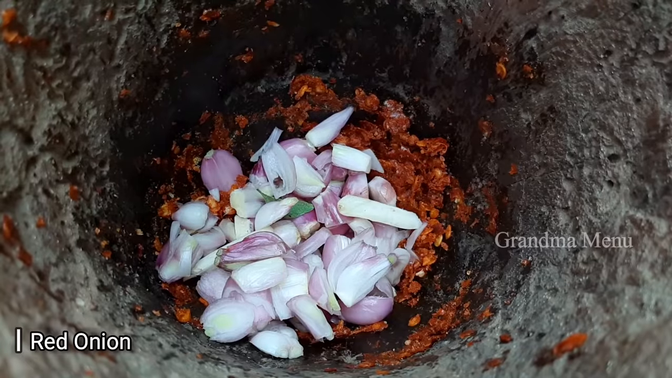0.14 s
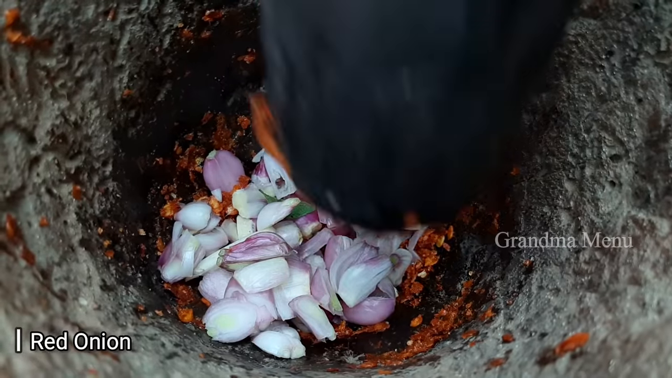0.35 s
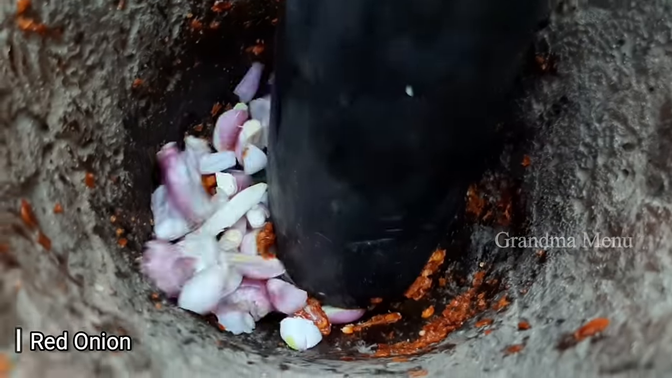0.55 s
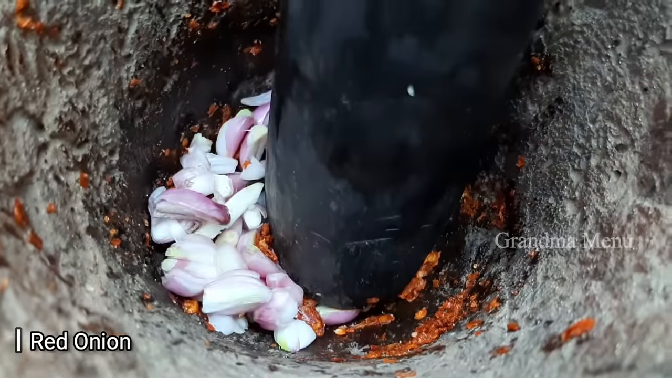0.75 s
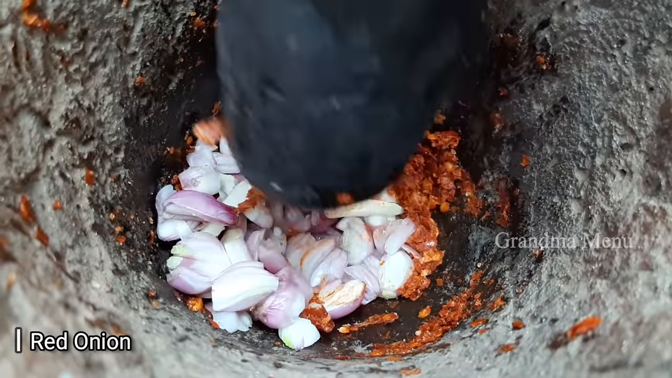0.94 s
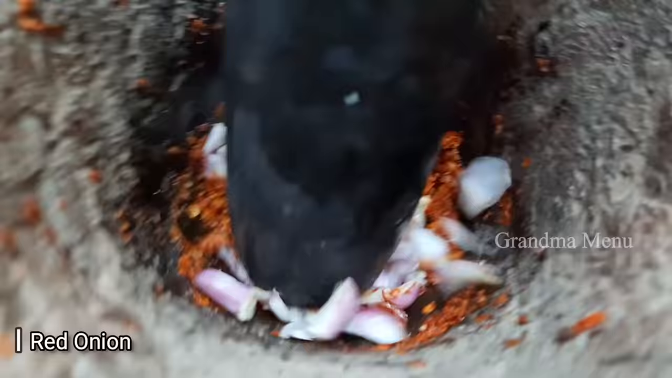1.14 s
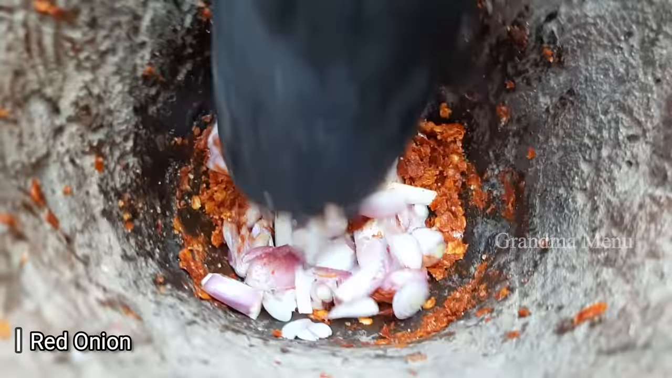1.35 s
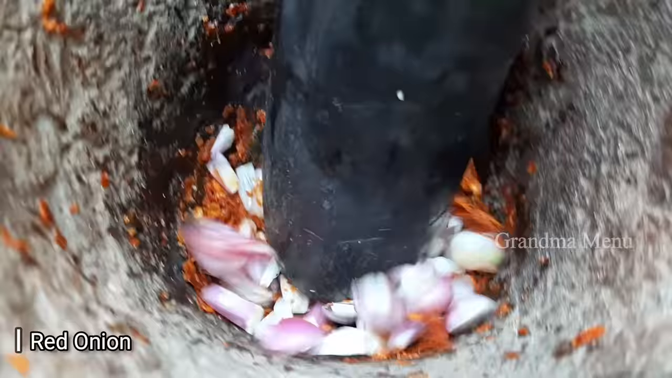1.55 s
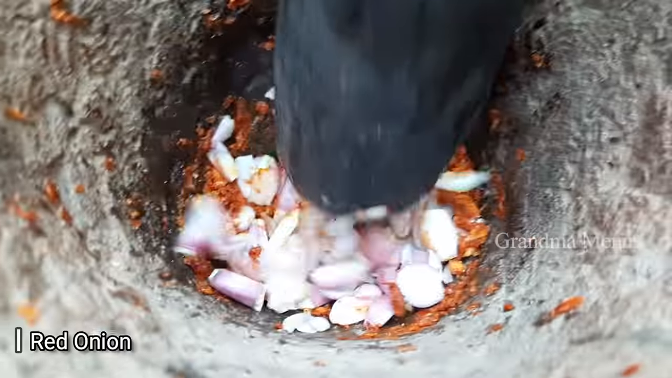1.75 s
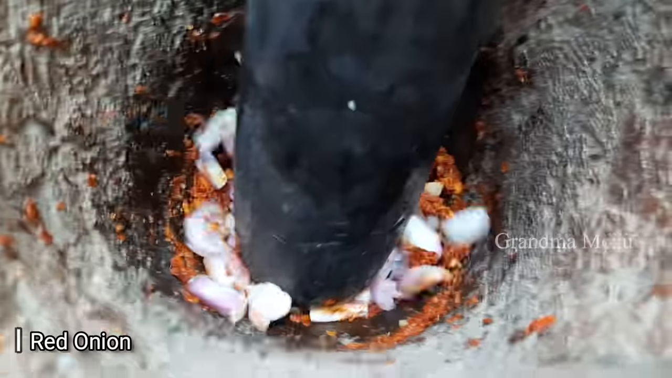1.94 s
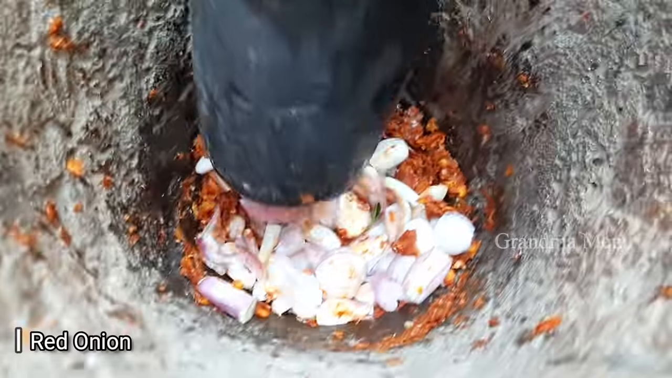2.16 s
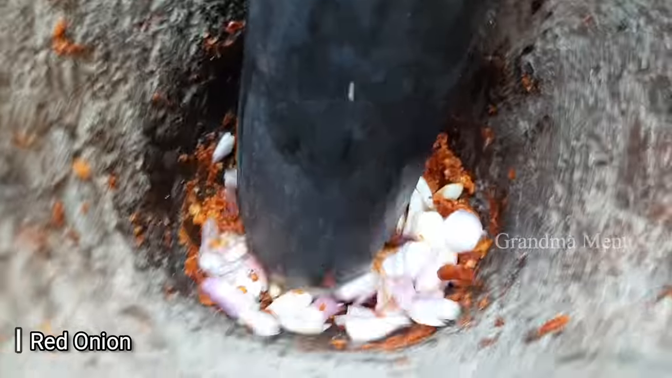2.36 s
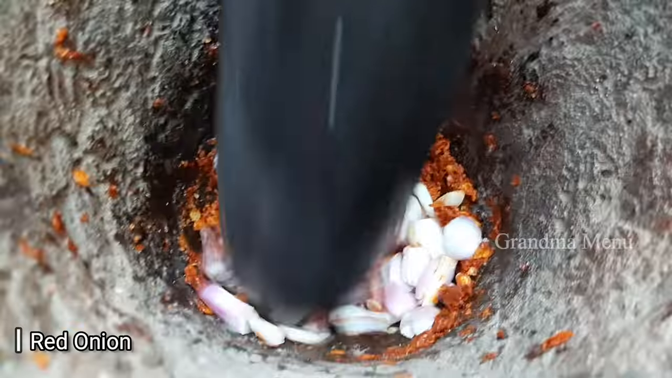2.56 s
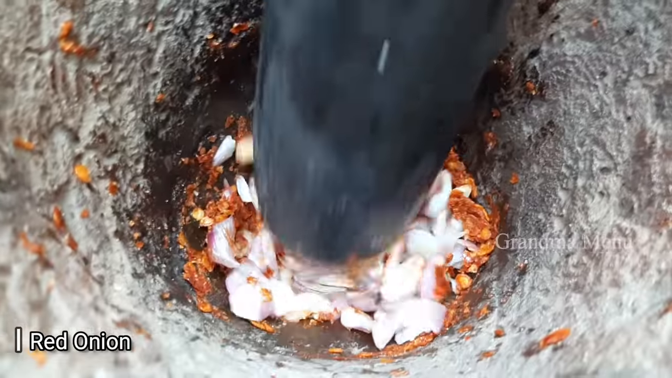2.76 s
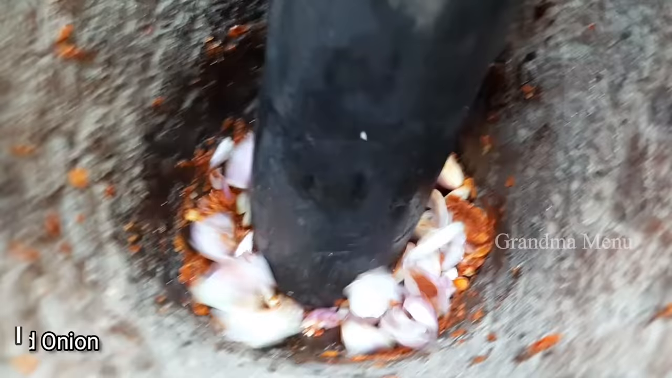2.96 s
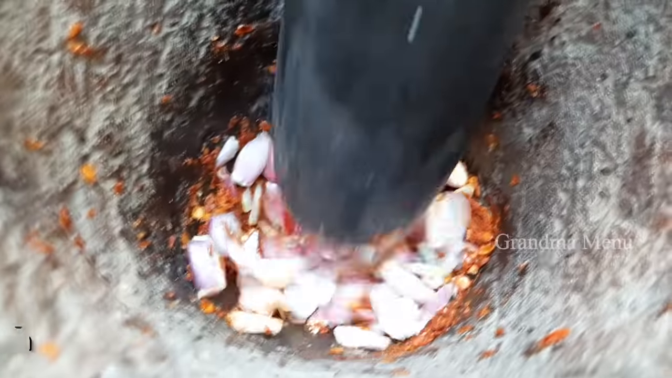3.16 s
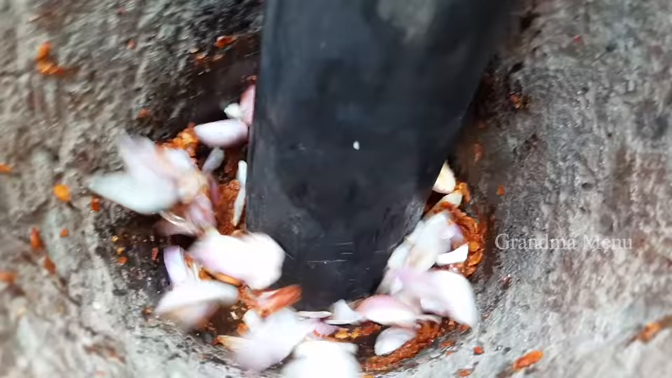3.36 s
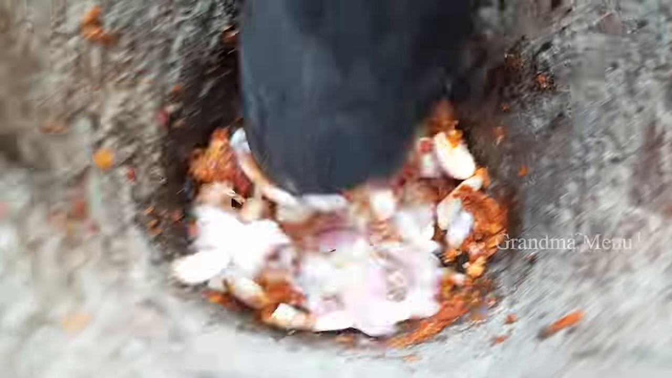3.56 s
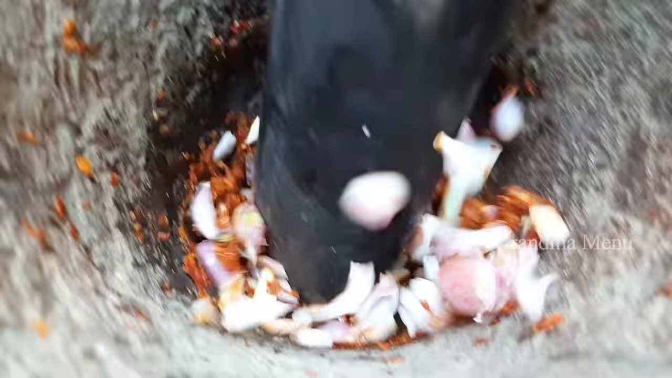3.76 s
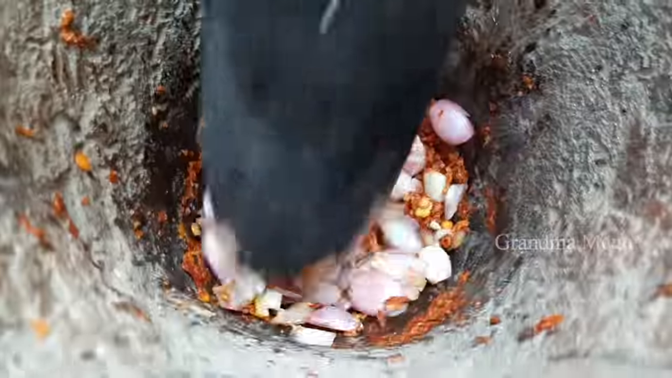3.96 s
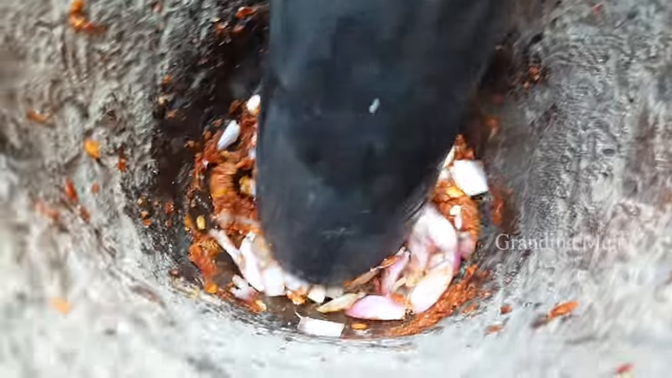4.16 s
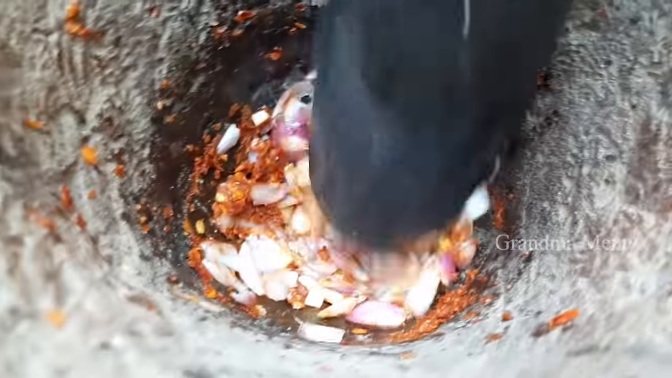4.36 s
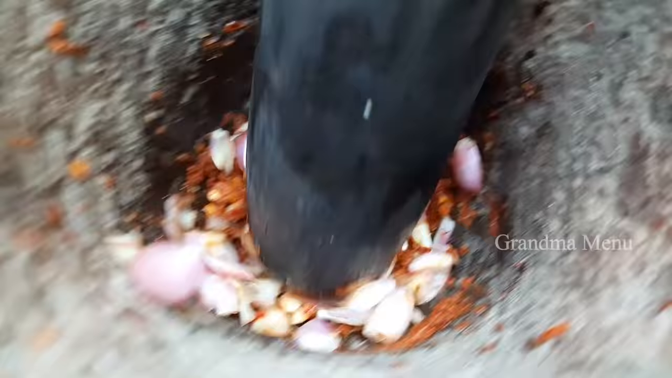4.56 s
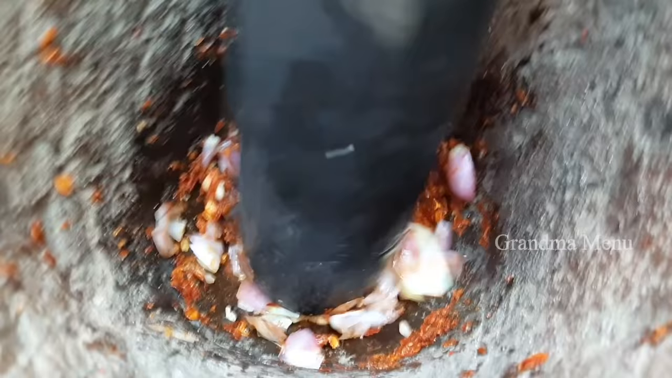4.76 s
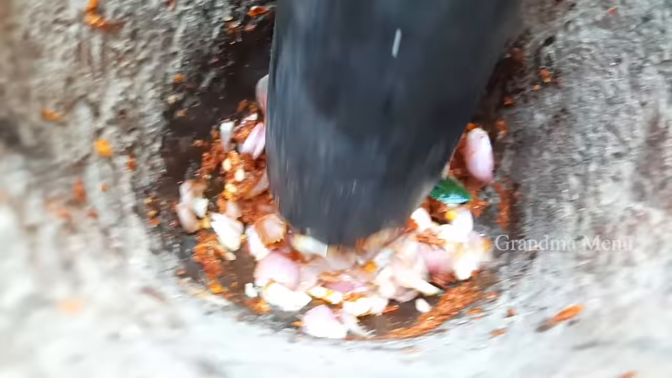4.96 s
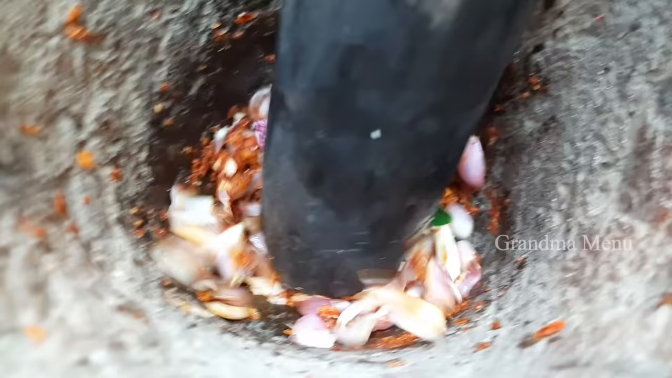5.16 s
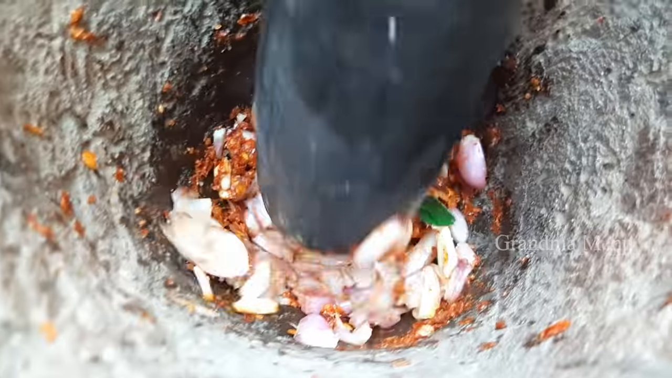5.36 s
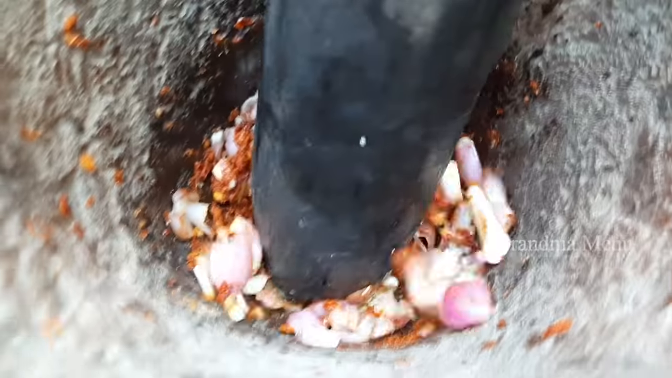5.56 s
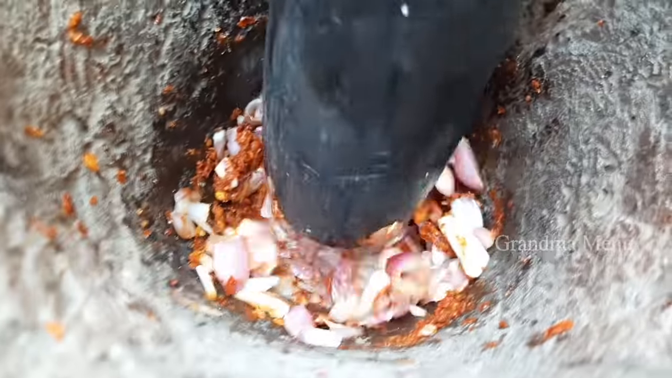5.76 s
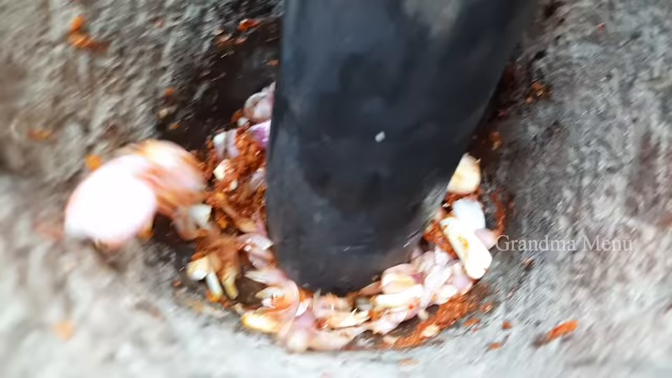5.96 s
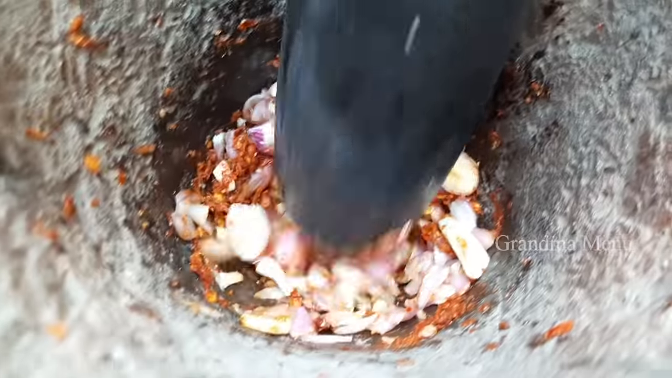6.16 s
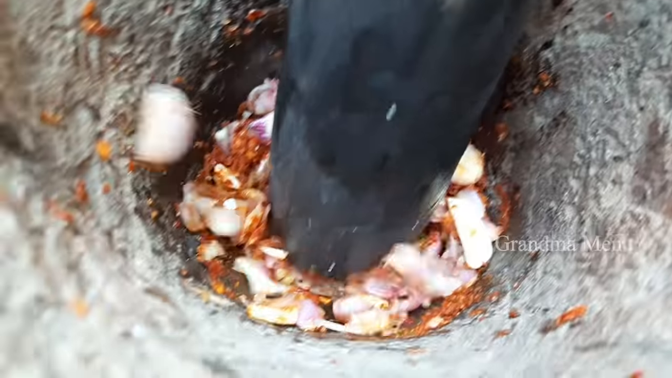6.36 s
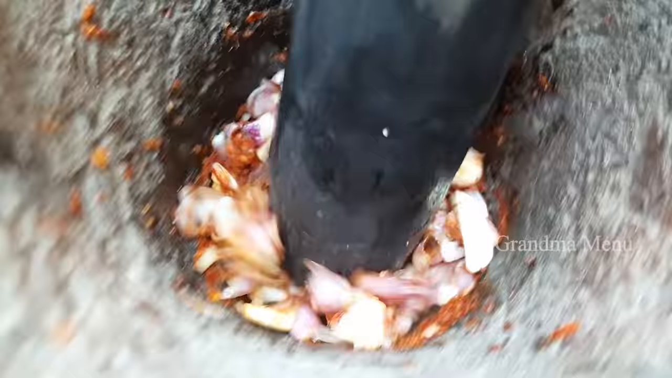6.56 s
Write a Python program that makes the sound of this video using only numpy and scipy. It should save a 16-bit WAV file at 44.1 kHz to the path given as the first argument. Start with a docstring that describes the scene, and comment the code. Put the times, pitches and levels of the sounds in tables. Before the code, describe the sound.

A wooden pestle pounds sliced shallots and chilli paste in a deep mortar, close to the microphone and slightly left. The first stroke lands at about 0.5 seconds as a quick cluster of hollow knocks with a crunch. After a short pause, pounding resumes at 1.2 seconds and continues evenly, nearly three strokes a second. Each stroke mixes a wet crunch with a low thump. Those near 1.9, 2.7 and 4.8 seconds strike the bowl harder and ring briefly. From 3 to 3.8 seconds the strokes are crisp and juicy, and the loudest crunches come from 5.5 seconds to the last at 6.3. Flung wet bits land with small slaps around 1.5, 3.1, 4.3 and 5.6 seconds. Behind it all are a faint low rumble, soft hiss with occasional thin high swells, and a distant insect buzzing, clearest around one second.

```python
"""Pounding shallots in a mortar

Close to the microphone, a long wooden pestle pounds sliced shallots and chilli paste in a deep mortar.
Each stroke crushes crisp flesh and thumps the mortar on its support; some reach the bottom and make
it ring. Wet bits fly and land. Behind are a low rumble, soft hisses and the buzz of a far insect."""
import sys
import numpy as np
from scipy import signal
from scipy.fft import rfft, irfft, next_fast_len
from scipy.io import wavfile

SR = 44100
rng = np.random.default_rng(int(sys.argv[2]) if len(sys.argv) > 2 else 0)


def wav_record(signal):
    """Record a signal, one row per channel, as 16-bit PCM in the file named by sys.argv[1]."""
    frames = np.transpose(np.atleast_2d(signal))
    bounded = np.clip(frames, -1, 1)
    # unit amplitude maps onto the largest positive 16-bit level
    quanta = np.round(bounded * 32767).astype(np.int16)
    wavfile.write(sys.argv[1], SR, quanta)


N = 291501
T = np.arange(N) / SR

# Table levels are relative: each source adds its own gain.
# spectrum of the background rumble: f/Hz, level/dB
RUMBLE_SPECTRUM = [(20, -38), (32, -20), (48, 1), (75, 0), (120, -8), (170, -15), (240, -15), (400, -24),
                   (550, -21), (900, -32), (2000, -48), (8000, -80)]
# slow rise and fall of the rumble: t/s, level/dB
RUMBLE_LEVELS = [(0.0, -57), (1.91, -55), (2.8, -61), (5.96, -57), (6.61, -53)]
# spectrum of the background hiss: f/Hz, level/dB
HISS_SPECTRUM = [(100, -35), (900, -11), (1500, 1), (2300, 3), (3200, -1), (4200, -4), (5400, -3.5),
                 (7500, -8), (9500, -12.5), (12000, -9), (16000, -8)]
# rise and fall of the hiss: t/s, middle/dB, treble/dB
HISS_LEVELS = [(0.0, -62, -62), (0.53, -61, -62), (0.81, -65, -68), (1.29, -63, -62), (1.54, -65, -64),
               (1.69, -70, -76), (2.08, -73, -81), (3.09, -72, -80), (3.2, -69, -78), (3.74, -68, -78),
               (3.88, -65, -73), (5.21, -64, -71), (5.69, -66, -69), (6.61, -64, -69)]
# likeness of the background at left and right: f/Hz, correlation
COHERENCE = [(60, .96), (290, .85), (640, .55), (1400, 0), (16000, 0)]
# high hisses: t/s, length/s, f/Hz, width/Hz, level/dB
HIGH_HISSES = [(.41, .22, 13000, 6000, -52), (.71, .14, 5400, 250, -59), (1.28, .45, 12350, 160, -61),
               (1.2, .6, 15200, 400, -63), (1.55, .3, 5300, 200, -63), (5.72, .8, 5350, 300, -58)]
# swells of the far insect: t/s, level/dB
INSECT_LEVELS = [(0, -61), (.65, -62), (1.0, -50), (1.15, -57), (1.38, -54), (1.9, -78), (3.4, -76),
                 (3.95, -63), (6.6, -65)]
# resonances of its body: f/Hz, width/Hz, level/dB
INSECT_BODY = [(2270, 200, 0), (5300, 300, -15)]
# resonances of the bowl's hollow: f/Hz, width/Hz, level against the direct sound/dB
BOWL_RESONANCES = [(570, 70, 8), (1160, 90, -3), (1520, 70, 5.5), (2030, 70, 0), (3180, 160, -2),
                   (3600, 90, -2), (4800, 100, 4), (5500, 100, -3), (6650, 250, -3), (8900, 90, 0),
                   (11400, 120, 4), (14200, 110, 2), (15080, 90, 3)]
# wet bits landing: t/s, level/dB, low edge/Hz
LANDINGS = [(1.503, -30, 600), (2.728, -40, 3500), (3.1405, -23, 2800), (3.688, -31, 2800),
            (4.160, -37, 2800), (4.299, -24, 2800), (5.609, -29, 1500), (5.69, -35, 800)]
# modes of mortar and pestle: f/Hz, level/dB, t60/s, left over right/dB, right lag/rad
MORTAR_MODES = [(156, -17, .11, 4, 0), (296, -9.5, .14, 1, -.4), (390, -11, .06, 3, .3),
                (556, -8, .06, 5, .8), (586, -2, .138, 5, .9), (760, -7, .03, 3, .3),
                (890, -9, .05, 2, -.5), (926, -4.5, .1, 2.5, -.8), (1120, -16, .045, 1, .5),
                (1222, -15, .07, -1, .8), (1276, -14, .06, -1, 1), (1326, -11, .06, -1, 1.2),
                (1446, -13, .065, 1, 1.5), (1526, -3.5, .08, 2, 1.7), (1769, -7, .055, 4, 1.6),
                (2040, -9, .05, 6, 1.8)]
# strokes that reach the bowl: t/s, ring/dB, push/dB, hardness/Hz, thump/dB, crunch/dB, squeeze/s
BOWL_STROKES = [(0.4798, -12.5, -32, 2300, -46, -35, .001), (0.5030, -18, -13, 1200, -23, -36, .006),
                (0.5098, -19, -20, 1300, -40, -33.5, .015), (1.1835, -38, -23, 1100, -30, -31, .026),
                (1.9428, -10.5, -8, 1900, -24, -31.5, .015), (2.2905, -33, -36, 1300, -38, -46, .004),
                (2.6630, -8.5, -4, 1600, -21, -27.5, .009), (4.0900, -29, -18, 1800, -21, -27.5, .022),
                (4.8338, -13, -10, 1900, -20, -26.5, .014)]
# strokes that end in the flesh: peak t/s, crunch/dB, body and spray against the crunch/dB,
# build-up over the last 20 dB/s, crispness 0-1, thump/dB
FLESH_STROKES = [(1.588, -25.5, -3.5, -3, .030, 0, -41), (2.324, -28.5, -1, -8, .028, .45, -44),
                 (3.035, -29, 0, -1, .020, .9, -25), (3.394, -23, -.5, 1, .009, .9, -23),
                 (3.7475, -25, -3, -1.5, .021, 1, -25), (4.491, -30, -2, -6, .050, .1, -32),
                 (5.2065, -27, -4, -2, .036, .9, -34), (5.558, -21.5, -5.5, 0, .009, .9, -26),
                 (5.923, -19, -7, -3, .009, .7, -22), (6.288, -17.5, -6, -7, .018, .7, -23)]
# colour of the bursting cells: f/Hz, gain/dB
CRUNCH_SPECTRUM = [(200, -3), (400, 0), (600, 3), (900, 1), (1400, 3), (2000, -.5), (2600, -2.5),
                   (3300, -2), (4400, -6), (5800, -5), (7000, -6), (9500, -8), (13000, -5.5), (16000, -9.5)]


def from_db(db):
    """Decibels to gain."""
    return 10 ** (np.asarray(db) / 20)


def rms_one(x):
    """Scale to unit power."""
    return x / np.sqrt(np.mean(x ** 2) + 1e-20)


def in_time(rows):
    """Each column of a curve, sample by sample."""
    times, *columns = np.transpose(rows)
    return [np.interp(T, times, column) for column in columns]


def at_hz(points, hz):
    """Read a spectrum on a log-frequency axis."""
    known_hz, values = np.transpose(points)
    return np.interp(np.log(hz), np.log(known_hz), values)


def shaped(x, spectrum):
    """Give a short sound a smooth spectrum."""
    hz = np.arange(len(x) // 2 + 1) * SR / len(x) + 1
    return irfft(rfft(x) * from_db(at_hz(spectrum, hz)), len(x))


def butter(x, hz, kind, order=2):
    """Causal Butterworth filter."""
    sections = signal.butter(order, np.clip(hz, 10, .47 * SR), kind, fs=SR, output="sos")
    return signal.sosfilt(sections, x + 1e-18)


def resonate(x, hz, width_hz):
    """Resonance with gain one at its peak."""
    r = np.exp(-np.pi * width_hz / SR)
    feedback = [1, -2 * r * np.cos(2 * np.pi * hz / SR), r * r]
    return signal.lfilter(np.array([1, 0, -1]) * (1 - r * r) / 2, feedback, x + 1e-18)


def drift(rate_hz):
    """Slow random wander of unit power."""
    knots = rng.standard_normal(int(N / SR * rate_hz) + 2)
    return rms_one(np.interp(T * rate_hz, np.arange(len(knots)), knots))


def grains(size, per_s, spread_db):
    """Random snaps of uneven size."""
    sizes = from_db(spread_db * np.minimum(rng.exponential(1, size), 4))
    return rms_one((rng.random(size) < per_s / SR) * sizes * rng.choice([-1, 1], size))


def add(out, s, sound):
    """Mix a sound in at s seconds."""
    i = max(round(s * SR), 0)
    out[..., i:i + sound.shape[-1]] += sound[..., :N - i]


def pan(db):
    """Gains that put the left channel db above the right."""
    return from_db(np.array([[db], [-db]]) / 2)


def stereo_sine(hz, t, lag_rad, phase=0):
    """A vibration whose phase lags on the right."""
    return np.sin(2 * np.pi * hz * t + phase - np.array([[0], [lag_rad]]))


def stereo_noise(spectrum):
    """Coloured noise, alike on both sides of the microphone in the bass, unrelated in the treble."""
    size = next_fast_len(N)
    hz = np.arange(size // 2 + 1) * SR / size + 1
    alike = at_hz(COHERENCE, hz)
    mid, side = rfft(rng.standard_normal((2, size))) * from_db(at_hz(spectrum, hz))
    left_right = np.sqrt(1 + alike) * mid + np.sqrt(1 - alike) * side * [[1], [-1]]
    return rms_one(irfft(left_right, size)[:, :N])


def rumble(gain_db=1.5, pan_db=4.2):
    """A low rumble in the background, a little to the left."""
    return from_db(in_time(RUMBLE_LEVELS)[0] + gain_db) * stereo_noise(RUMBLE_SPECTRUM) * pan(pan_db)


def hiss(split_hz=6500, middle_db=6.5, treble_db=5.2):
    """A soft hiss all around, whose top opens and closes."""
    middle_level, treble_level = in_time(HISS_LEVELS)
    noise = stereo_noise(HISS_SPECTRUM)
    middle = from_db(middle_level + middle_db) * rms_one(butter(noise, split_hz, "low"))
    treble = from_db(treble_level + treble_db) * rms_one(butter(noise, split_hz, "high"))
    return middle - treble  # the bands are in opposite phase at the split


def high_hisses():
    """High hisses, most of them narrow and whistling, swell and fade."""
    out = np.zeros((2, N))
    for s, length, hz, width, db in HIGH_HISSES:
        noise = rng.standard_normal((2, SR))
        whistle = rms_one(resonate(resonate(noise, hz, width), hz, width))
        swell = np.cos(np.pi * np.clip((T[:SR] - .5) / length, -.5, .5))
        add(out, s - .5, from_db(db) * whistle * swell)
    return out


def insect(click_hz=146.4, waver=.003, rasp=.25):
    """Far off, an insect clicks steadily into its body resonances."""
    cycles = np.cumsum(click_hz * (1 + waver * drift(8))) / SR
    clicks = rms_one(np.diff(np.floor(cycles), prepend=0))
    drive = clicks + rasp * rng.standard_normal(N)
    buzz = sum(from_db(db) * resonate(resonate(drive, hz, width), hz, 4 * width)
               for hz, width, db in INSECT_BODY)
    return from_db(in_time(INSECT_LEVELS)[0]) * rms_one(buzz)


def reflections(x, wet_db=-21.5, t60=.17, dull_hz=8000):
    """Surfaces near the mortar return a faint, short, dull tail."""
    t = T[:SR // 3]
    tail = butter(rng.standard_normal((2, len(t))), dull_hz, "low", order=1)
    tail *= from_db(-60 * t / t60) * np.clip(t / .008, 0, 1)
    tail /= np.linalg.norm(tail, axis=1, keepdims=True)
    return from_db(wet_db) * signal.oaconvolve(x, tail, axes=1)[:, :N]


def hollow(x, scatter=.9, scatter_t60=.010, right_lag_s=.00021):
    """The bowl's resonances, heard later on the right, and wall echoes that change with each sound."""
    t = T[:SR // 20]
    click = signal.unit_impulse(len(t))
    left = click + sum(from_db(db) * resonate(click, hz, width) for hz, width, db in BOWL_RESONANCES)
    right = np.pad(left, (round(right_lag_s * SR), 0))[:len(t)]
    walls = butter(rng.standard_normal((2, len(t))) * from_db(-60 * t / scatter_t60), 1300, "high")
    walls *= scatter / np.linalg.norm(walls, axis=1, keepdims=True)
    return signal.fftconvolve(x[None], np.array([left, right]) + walls, axes=1)


def wet_bits(t60=.035, gain_db=-8.0):
    """Flung bits slap on the bowl's wall; bigger ones sound lower."""
    out, t = np.zeros((2, N)), T[:SR // 10]
    for s, db, low_hz in LANDINGS:
        slap = from_db(db + gain_db - 60 * t / t60) * grains(len(t), per_s=12000, spread_db=2.0)
        slap = butter(butter(slap, low_hz, "high"), 1.5 * low_hz, "low", order=1)
        add(out, s, hollow(slap))
    return out


def jolts(limp_delay_s=.018, crisp_delay_s=.004, settle_s=.145, settle_db=-41):
    """Every stroke jolts the mortar, which settles back as the pestle lifts: t/s, level/dB."""
    blows = [(s, db) for s, _, _, _, db, _, _ in BOWL_STROKES]
    for s, *_, crisp, db in FLESH_STROKES:
        # the pestle's weight arrives after the burst, later through limp flesh
        blows.append((s + np.interp(crisp, [0, 1], [limp_delay_s, crisp_delay_s]), db))
    return blows + [(s + settle_s, min(settle_db, db - 6)) for s, db in blows]


def thumps(rock_hz=79, rock_t60=.095, flex_hz=145, flex_t60=.04, flex_db=-1.5, gain_db=.3, pan_db=4.8):
    """The heavy mortar rocks for a few cycles on its support."""
    out, t = np.zeros((2, N)), T[:SR // 3]
    rock = stereo_sine(rock_hz, t, lag_rad=.4) * from_db(-60 * t / rock_t60)
    flex = np.sin(2 * np.pi * flex_hz * t) * from_db(flex_db - 60 * t / flex_t60)
    thump = butter(rock + flex, 300, "low")
    for s, db in jolts():
        add(out, s, from_db(db + gain_db) * thump)
    return out * pan(pan_db)


def contacts(lead_s=.003, limp_db=-8.0, ring_db=-10.0, push_db=-3.0, cushioned_hz=600):
    """Every stroke knocks on the bowl, bare or through flesh: t/s, ring/dB, push/dB, hardness/Hz."""
    hits = [stroke[:4] for stroke in BOWL_STROKES]
    for s, crunch_db, *_, crisp, _ in FLESH_STROKES:
        db = crunch_db + limp_db * (1 - crisp)  # limp flesh cushions more
        hits.append((s - lead_s, db + ring_db, db + push_db, cushioned_hz))
    return hits


def knocks(push_hz=205, push_t60=.02, push_db=8.0, push_rise_s=.0018, push_pan_db=3.8, vary_db=1.0):
    """A hard contact pushes a short pulse of air out of the bowl and sets the modes ringing."""
    out, t = np.zeros((2, N)), T[:SR // 4]
    modes = np.array([-pan(side_db) * stereo_sine(hz, t, lag) * from_db(db - 60 * t / t60)
                      for hz, db, t60, side_db, lag in MORTAR_MODES])
    push = -stereo_sine(push_hz, t, lag_rad=.4, phase=2) * from_db(push_db - 60 * t / push_t60)
    push *= 1 - np.exp(-(t / push_rise_s) ** 2)
    for s, ring_db, blow_db, hard_hz in contacts():
        strengths = from_db(ring_db + vary_db * rng.standard_normal((len(modes), 2, 1)))
        ring = butter((strengths * modes).sum(axis=0), hard_hz, "low")  # flesh softens the contact
        add(out, s, ring + from_db(blow_db) * push * pan(push_pan_db))
    return out


def burst(swell_db, body_db, spray_db):
    """One stream of bursting cells gives the squashy body, the crisp crackle and the spray of juice."""
    cells = from_db(swell_db) * grains(len(swell_db), per_s=7000, spread_db=3.6)
    body = from_db(body_db) * butter(cells, [220, 1900], "band")
    crackle = butter(cells, [1900, 7000], "band")
    spray = from_db(spray_db) * butter(cells, 7000, "high")
    return hollow(shaped(body - crackle + spray, CRUNCH_SPECTRUM))


def crunch(gain_db=3.5, low_pan_db=4.0, high_pan_db=-.3, sink_curve=1.15):
    """Cells burst ever harder as the pestle sinks in, up to a snap; under a knock they burst evenly."""
    snap_db, crack_db, snap_s = 7.0, 3.0, .0042
    limp_fall_s, crisp_fall_s, squeeze_rise_s, squeeze_fall_s = .028, .017, .018, .026  # per 20 dB
    out, t = np.zeros((2, N)), T[:SR // 5] - .1
    before, after = np.maximum(-t, 0), np.maximum(t, 0)
    for s, db, body_db, spray_db, build_s, crisp, _ in FLESH_STROKES:
        # crisp slices give way all at once and fall silent sooner than limp ones
        snap = crisp * snap_db * np.exp(-(t / snap_s) ** 4)
        fall_s = np.interp(crisp, [0, 1], [limp_fall_s, crisp_fall_s])
        crack = crack_db * np.exp(-((t + .6 * build_s) / snap_s) ** 2)  # the top slice cracks first
        swell_db = db - 20 * ((before / build_s) ** sink_curve + after / fall_s)
        add(out, s + t[0], burst(swell_db + crack + snap, body_db, spray_db))
    for s, _, _, hard_hz, _, db, squeeze_s in BOWL_STROKES:
        rise_s = squeeze_rise_s * (1000 / hard_hz) ** 2  # harder contacts build up faster
        swell_db = db - 20 * (before / rise_s + np.maximum(t - squeeze_s, 0) / squeeze_fall_s)
        add(out, s + t[0], burst(swell_db, body_db=1.0, spray_db=-5.0))
    low = butter(out, 3500, "low", order=1)
    return from_db(gain_db) * (low * pan(low_pan_db) + (out - low) * pan(high_pan_db))


def scene():
    """The mortar close up and a little to the left, quiet surroundings behind."""
    mortar = crunch() + wet_bits() + knocks() + thumps()
    return mortar + reflections(mortar) + hiss() + rumble() + insect() + high_hisses()


def record(dry, low_cut_hz=44, ceiling=1.2, high_cut_hz=15900):
    """The microphone chain cuts the deepest bass, rounds the highest peaks and cuts the top."""
    rounded = ceiling * np.tanh(butter(dry, low_cut_hz, "high", order=4) / ceiling)
    return signal.sosfilt(signal.ellip(10, .2, 80, high_cut_hz, fs=SR, output="sos"), rounded)


dry = scene()
out = record(dry)
wav_record(out)
```